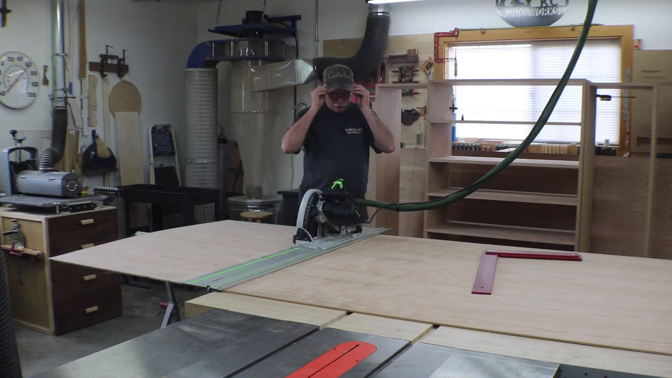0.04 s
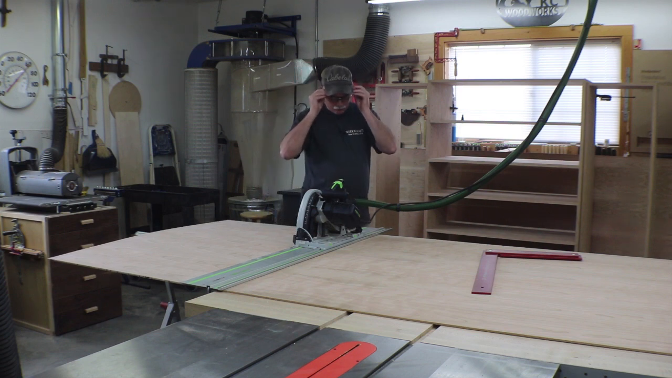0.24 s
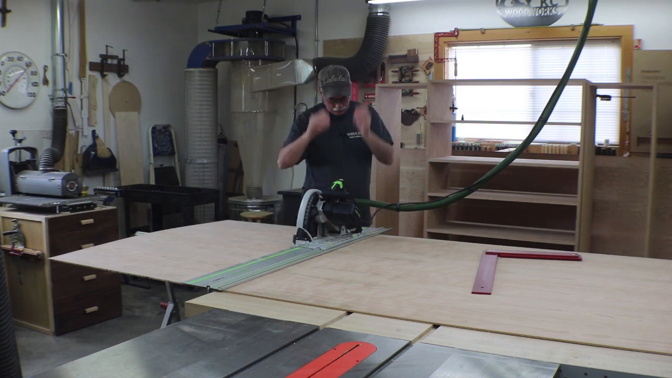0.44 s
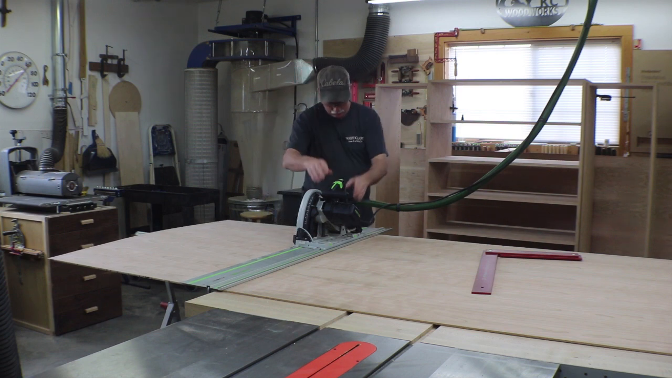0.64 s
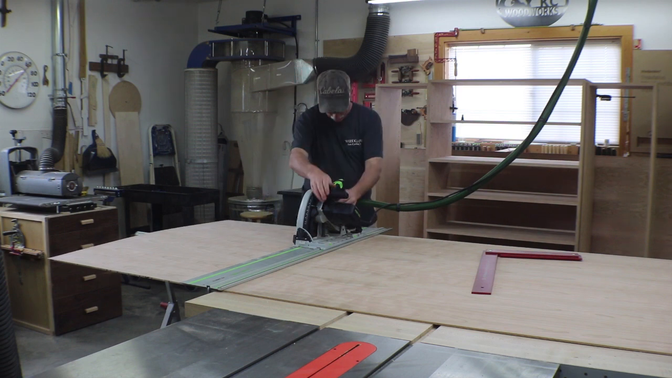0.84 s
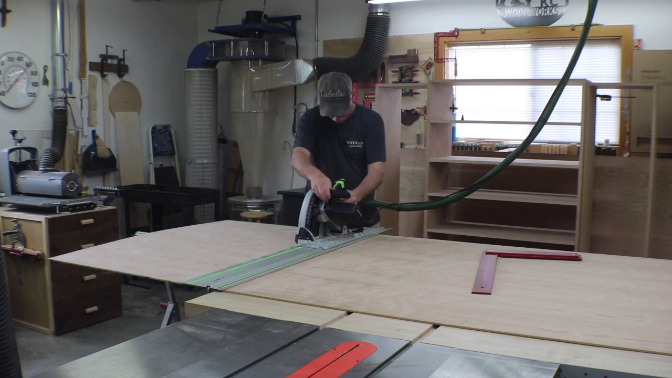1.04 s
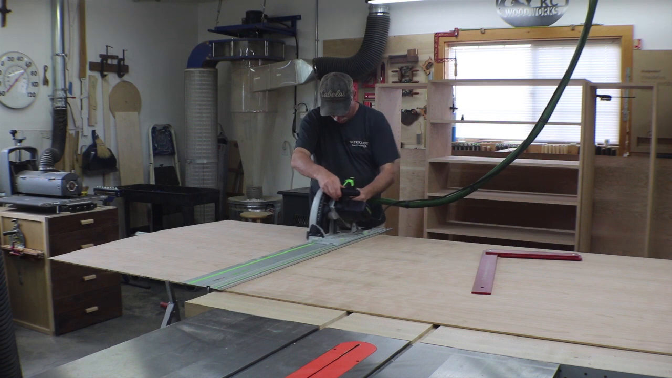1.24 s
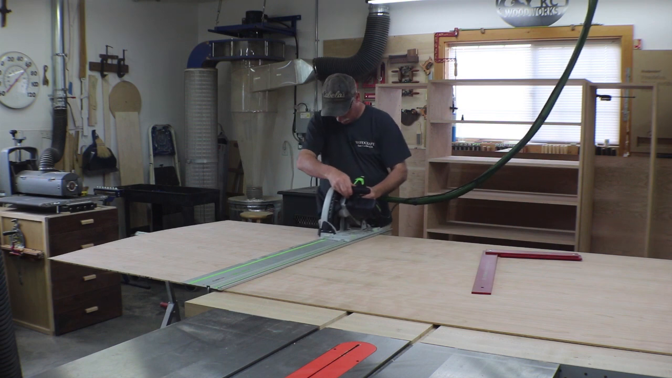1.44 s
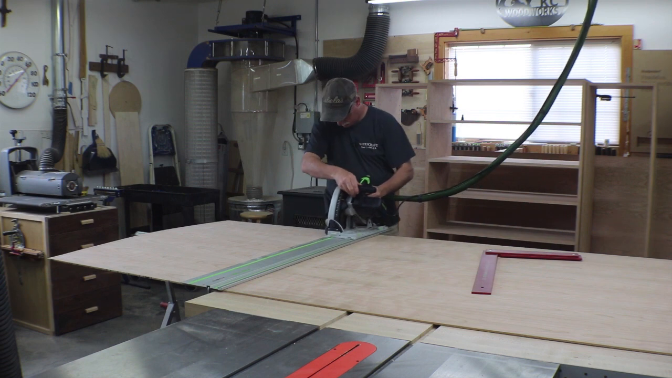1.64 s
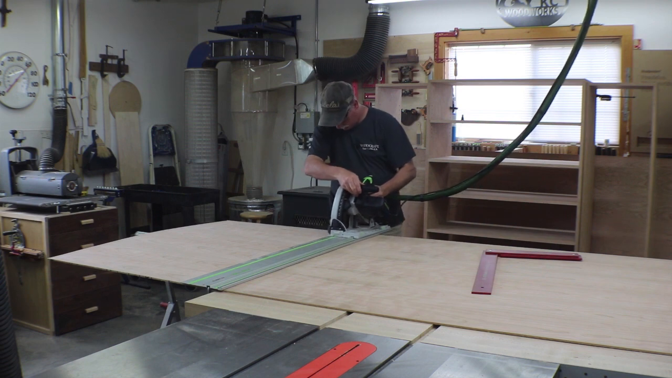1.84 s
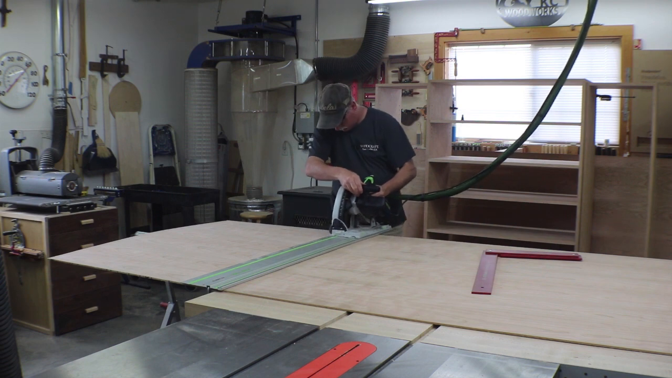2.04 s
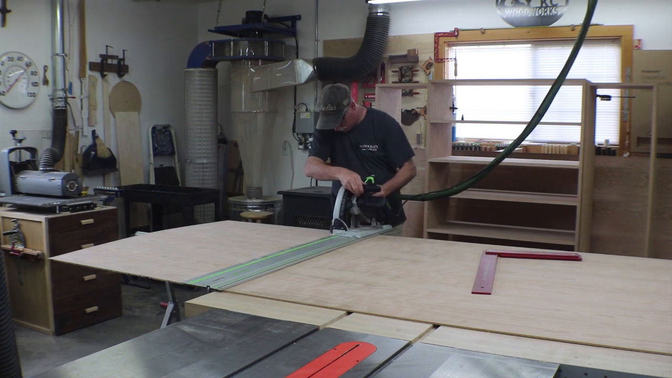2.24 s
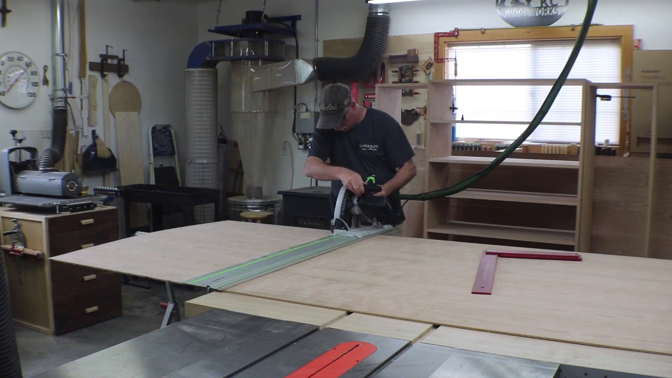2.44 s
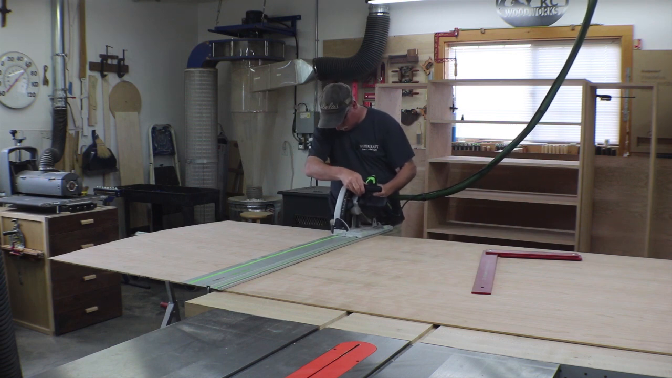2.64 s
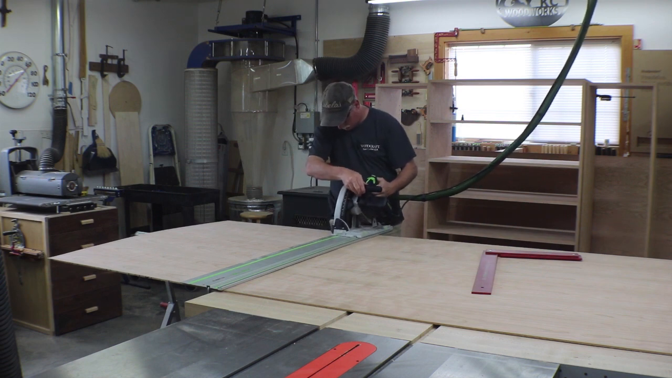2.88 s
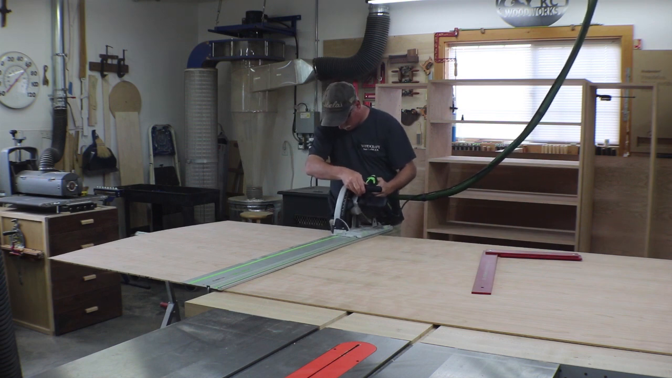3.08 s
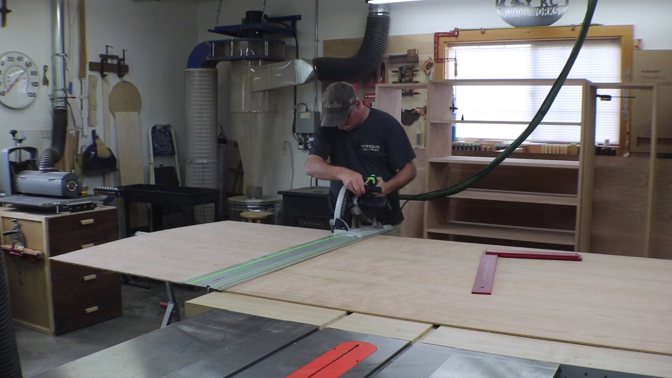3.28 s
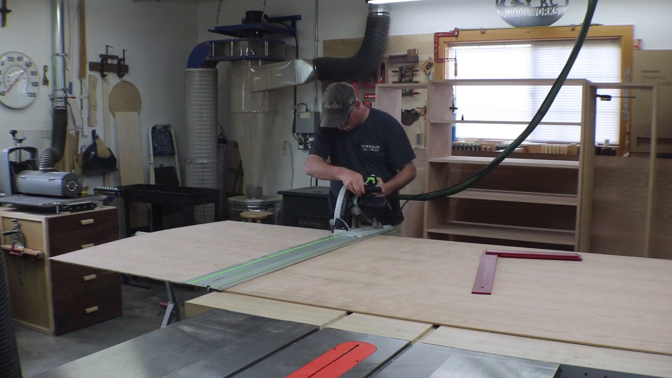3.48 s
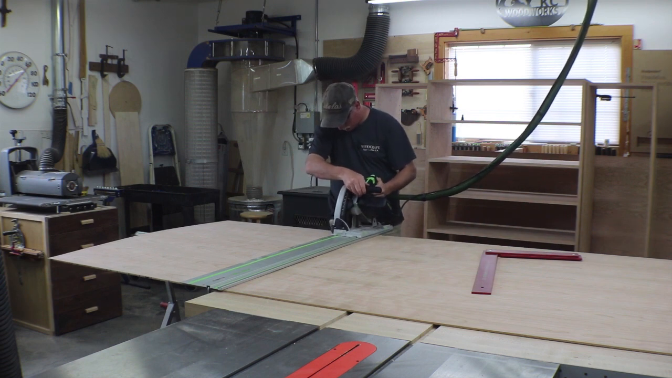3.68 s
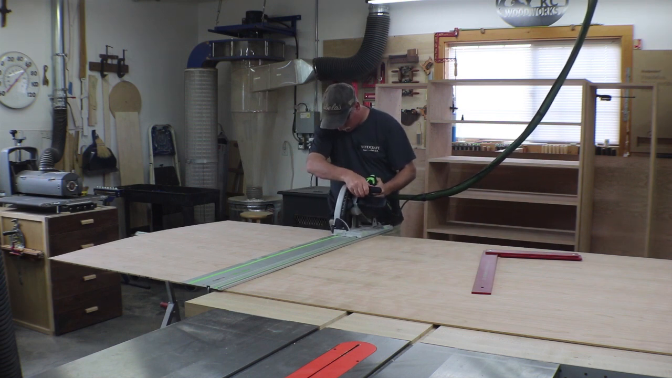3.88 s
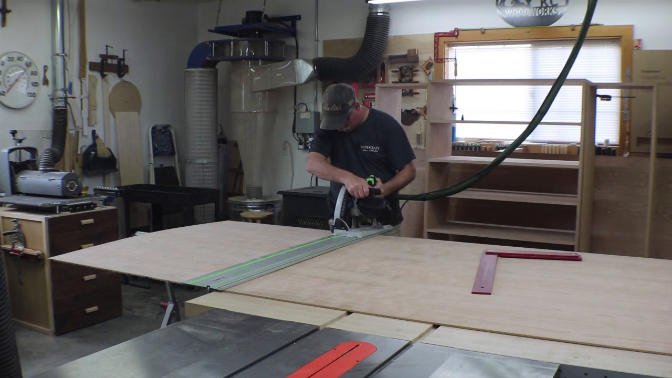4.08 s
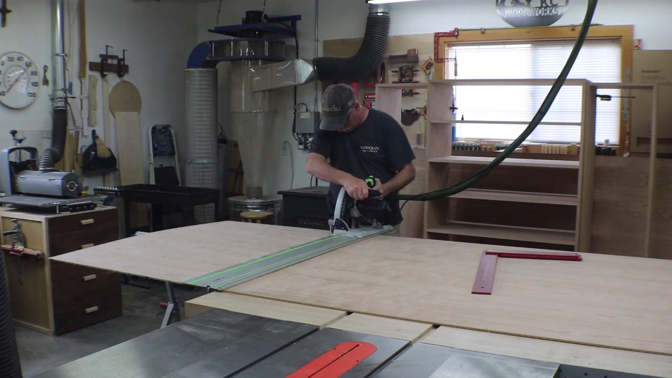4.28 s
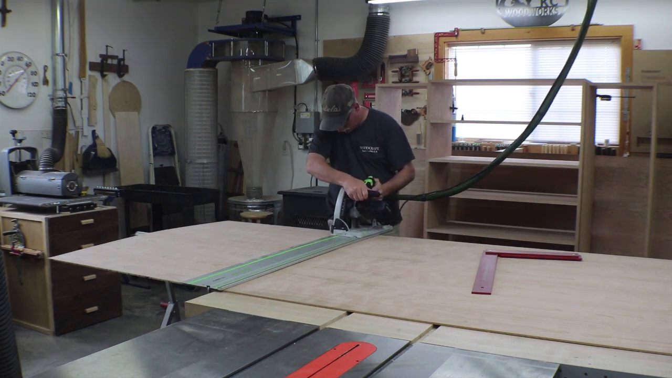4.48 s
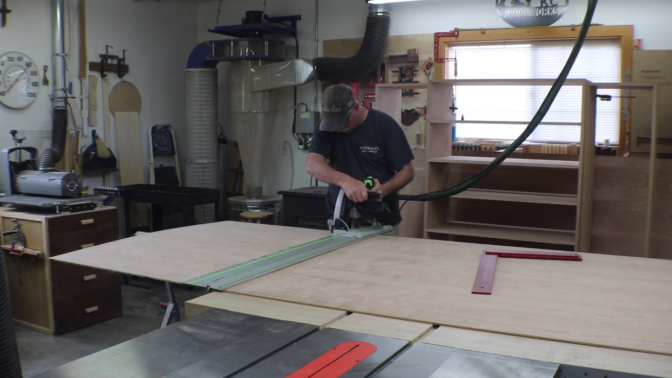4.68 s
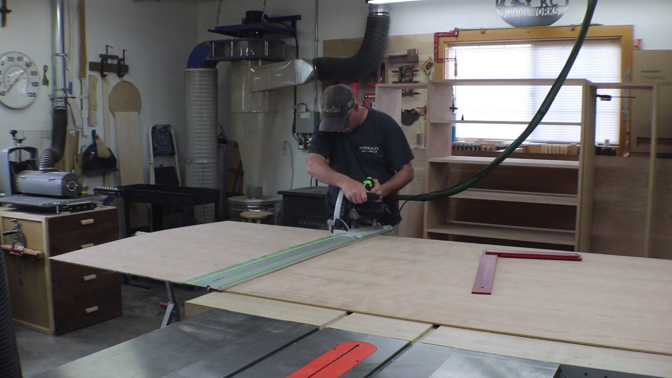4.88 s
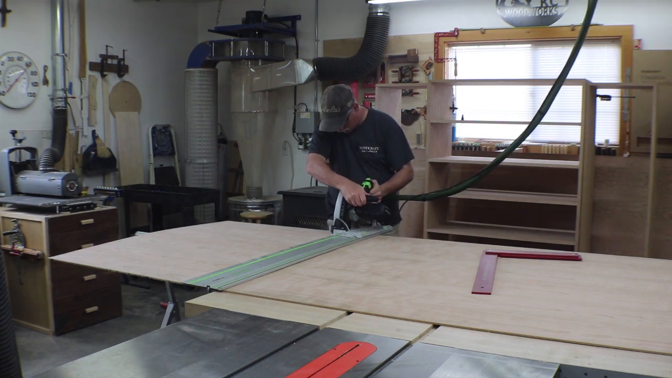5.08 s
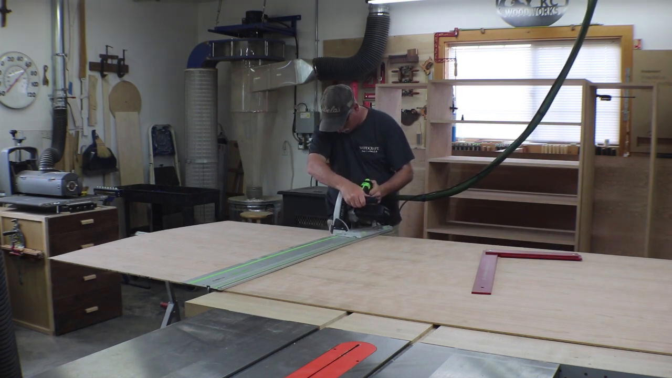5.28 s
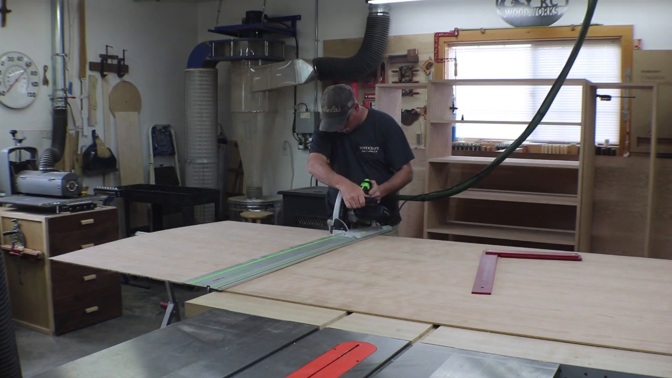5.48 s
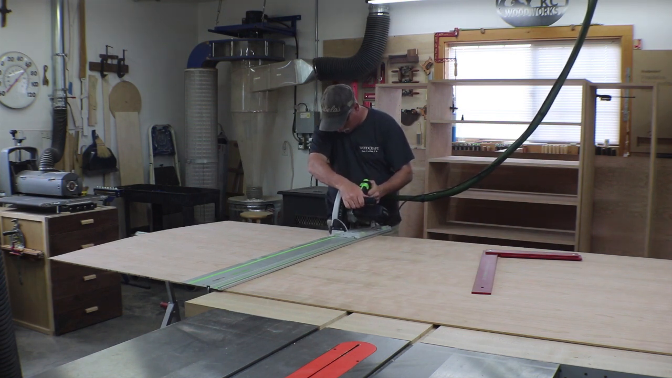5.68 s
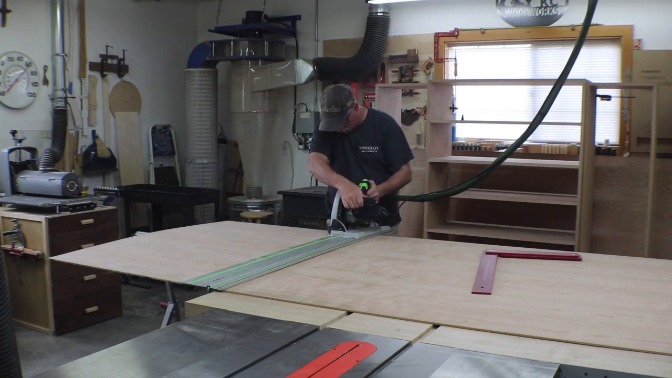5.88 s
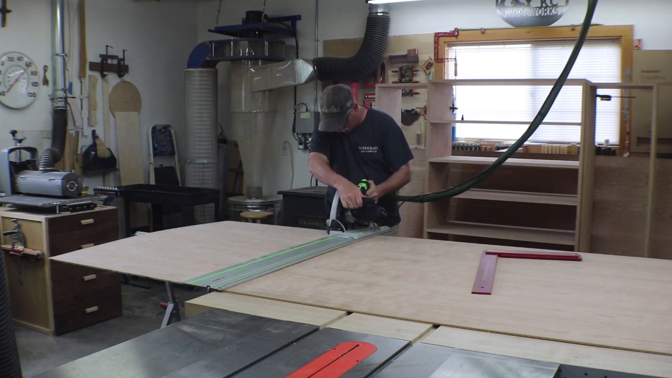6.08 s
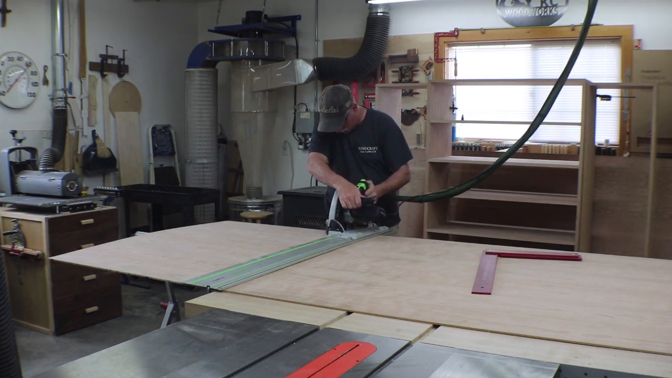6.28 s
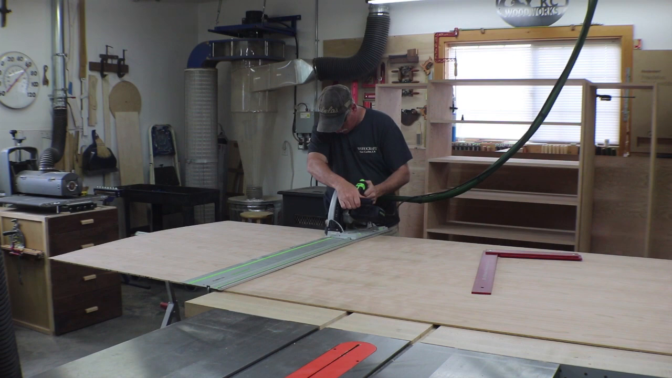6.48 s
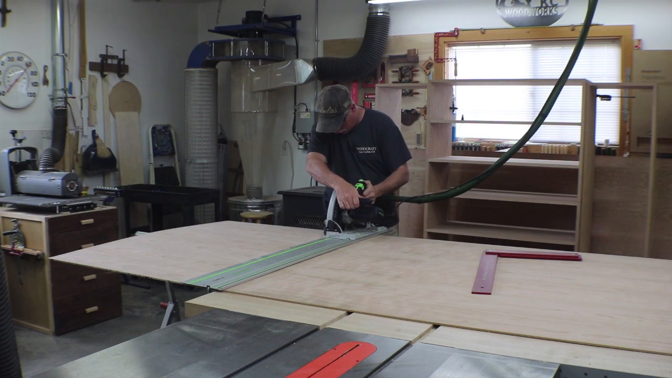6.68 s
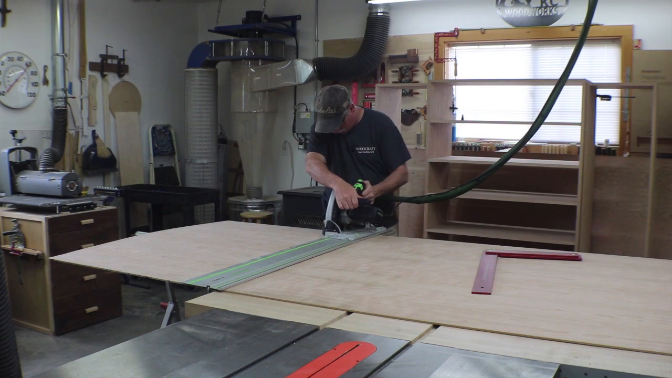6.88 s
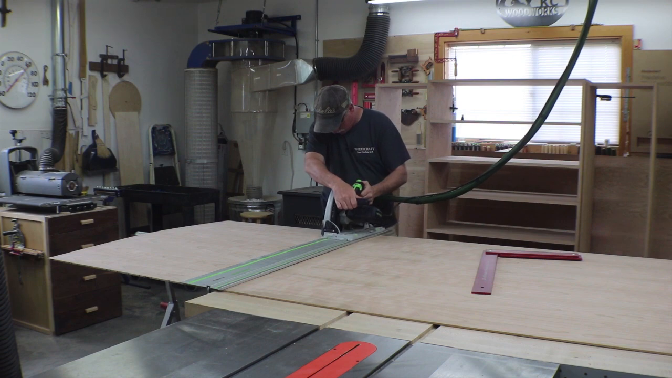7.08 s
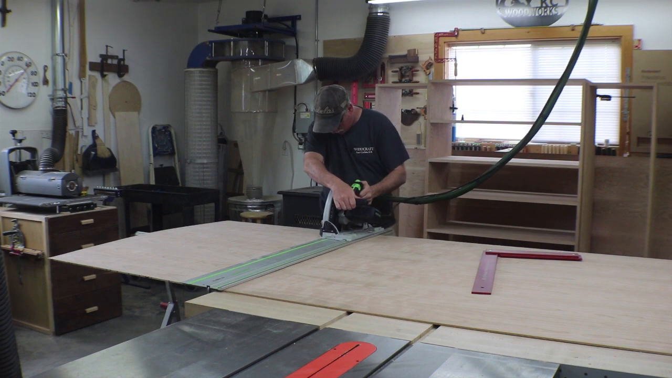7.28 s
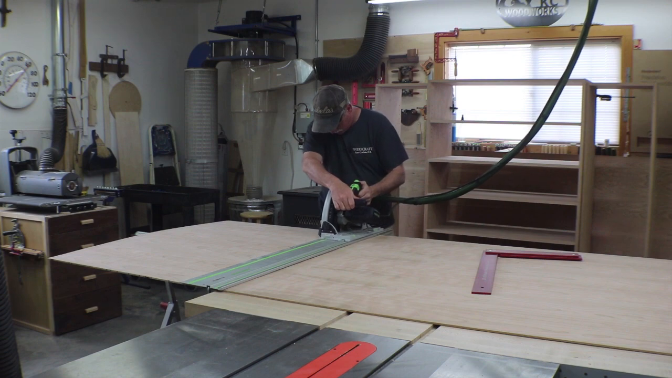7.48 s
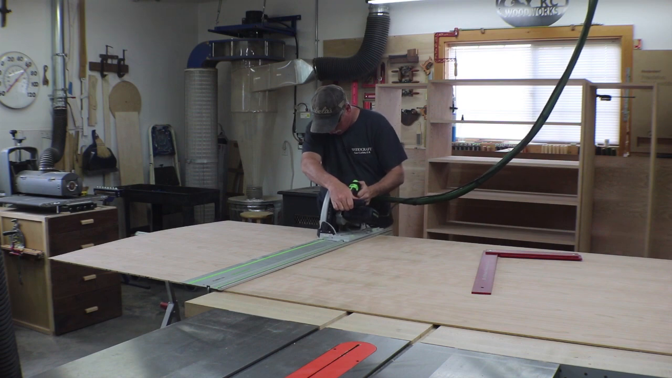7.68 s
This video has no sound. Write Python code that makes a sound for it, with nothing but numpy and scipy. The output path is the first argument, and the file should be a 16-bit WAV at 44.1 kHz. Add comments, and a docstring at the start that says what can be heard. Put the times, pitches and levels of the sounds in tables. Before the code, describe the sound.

A circular saw is knocked down and slid along its rail on plywood, its switch snaps, then the motor growls and whines up to a loud steady roar.

```python
"""A hand saw's motor soft-starts: it growls under the starting current, its windings buzz at twice the mains
rate, the shaft whine climbs, and shaped noise as air roar and a set of wavering steady tones take over. Before
that the saw is set on a plywood sheet (damped modes and noise), slid along its rail in grainy noise, and its
switch snaps as short rings. A small reverberant shop, nearly mono: only the hiss differs by channel."""
import sys
import numpy as np
from scipy import signal
from scipy.fft import rfft, irfft, next_fast_len
from scipy.io import wavfile
from scipy.ndimage import uniform_filter1d, map_coordinates

SR = 44100
rng = np.random.default_rng(int(sys.argv[2]) if len(sys.argv) > 2 else 0)


def convert_level_to_amplitude(level_db):
    """Map a level in decibels to its linear amplitude factor."""
    exponent = np.asarray(level_db, float) / 20
    return 10 ** exponent


def store_wav(level_fs):
    """Save 16-bit WAV to argv[1]."""
    pcm = np.round(np.clip(np.atleast_2d(level_fs), -1, 1) * 32767)
    wavfile.write(sys.argv[1], SR, pcm.T.astype(np.int16))


N = 340893
T = np.arange(N) / SR

# low shaking of sheet and bench, spectrum: hz, density_db
SHAKING = [(20, -40), (35, -10), (60, -9), (110, -4.5), (150, -6.5), (220, -12.5), (300, -57)]
# starting current as growl level, before surge and pulsing: time_s, level_db
CURRENT = [(3.4, -60), (3.474, -45.5), (3.49, -40), (3.56, -32), (3.68, -29.5), (3.705, -22), (3.727, -22),
           (3.729, -21), (4.4, -21.5), (4.8, -26.5), (5.4, -39), (5.9, -48), (7.73, -41)]
# whine wavering about full speed: time_s, pitch_hz, level_db
STEADY = [(4.87, 12748, -36), (5.07, 12677, -28), (5.17, 12721, -36), (5.18, 12720, -50), (5.2, 12714, -35),
          (5.28, 12736, -39), (5.35, 12703, -27), (5.39, 12736, -45), (5.46, 12747, -32),
          (5.54, 12803, -33), (5.77, 12778, -41), (5.89, 12742, -29), (5.9, 12758, -32), (6.02, 12740, -30),
          (6.23, 12773, -31), (6.34, 12753, -29), (6.36, 12763, -30), (7.38, 12759, -31), (7.5, 12754, -36),
          (7.63, 12780, -30), (7.69, 12742, -37), (7.72, 12751, -34)]

MAINS_HZ, FIRST_KICK_S, FULL_POWER_S = 60, 3.479, 3.728  # soft start
FULL_HZ, FULL_S = 425.2, 4.87  # shaft turns per second at full speed, and when it is reached
BARS = 30  # whine cycles per shaft turn
BUZZ_HZ = 120.52


def unit(x):
    """Scaled to rms 1."""
    return x / np.sqrt(np.mean(x ** 2) + 1e-20)


def along(points, hz):
    """Values between (Hz, value) points on a log axis."""
    f, v = np.transpose(points)
    return np.interp(np.log(hz + 1), np.log(f + 1), v)


def level_curve(rows):
    """Level per sample from (s, dB) rows; silent before the first, held after the last."""
    s, db = np.transpose(rows)
    return np.interp(T, s, db, left=-120)


def wobble(rate):
    """A smooth random curve, rate knots a second."""
    knots = rng.standard_normal(int(N * rate / SR) + 4)
    coarse = map_coordinates(knots, [T[::16] * rate])
    return np.interp(T, T[::16], coarse)


def filtered(x, response):
    """x times a response of frequency."""
    m = next_fast_len(N + 8192)
    return irfft(rfft(x, m) * response(np.fft.rfftfreq(m, 1 / SR)), m)[..., :N]


def bell(hz, centre, width):
    """A resonance-shaped weight, 1 at its centre."""
    return 1 / (1 + (2 * (hz - centre) / width) ** 2)


def rush(spectrum, patchy_db, peaks=()):
    """Coloured noise of rms 1 with time-frequency patches of random gain."""
    z = signal.stft(rng.standard_normal(N), nperseg=512)[2]
    patches = uniform_filter1d(rng.standard_normal(z.shape), size=6, axis=0)
    patches = uniform_filter1d(patches, size=10, axis=1)
    noise = signal.istft(z * convert_level_to_amplitude(patchy_db * unit(patches)), nperseg=512)[1][:N]
    boost = lambda hz: sum(db * bell(hz, c, w) for c, w, db in peaks)
    return unit(filtered(noise, lambda hz: convert_level_to_amplitude(along(spectrum, hz) + boost(hz))))


def ring(modes, scatter_db):
    """Damped modes of one blow, at new random strengths each time."""
    t = T[:SR // 4]
    out = 0
    for hz, db, t60 in modes:
        level = convert_level_to_amplitude(db + scatter_db * rng.standard_normal() - 60 * t / t60)
        onset = 1 - np.exp(-2 * t * hz)
        out = out + level * np.sin(2 * np.pi * hz * t) * onset
    return out


def shop(x):
    """The room's answer: a delayed noise tail in which each frequency dies at its own speed."""
    # decay of the shop: hz, t60_s
    decay = [(200, 1), (2000, 0.36), (7000, 0.047), (14000, 0.03)]
    hz, t, z = signal.stft(rng.standard_normal(SR // 2), SR, nperseg=256)
    tail = signal.istft(z * convert_level_to_amplitude(-60 * t / along(decay, hz)[:, None]), SR, nperseg=256)[1]
    return signal.fftconvolve(np.pad(x, (300, 0)), tail / np.linalg.norm(tail))[:N]


def swell(s, db, half):
    """A bell-shaped gain over time."""
    return convert_level_to_amplitude(db) * np.exp(-((T - s) / half) ** 2)


def push(start, length, rise, fall):
    """Gain of one push, top 1; rise and fall are powers of its shape."""
    u, top = np.clip((T - start) / length, 0, 1), rise / (rise + fall)
    return (u / top) ** rise * ((1 - u) / (1 - top)) ** fall


def surge():
    """Jumps to 1 at full power and decays exponentially."""
    decay_s = 0.0301
    return (T > FULL_POWER_S) * np.exp(-np.abs(T - FULL_POWER_S) / decay_s)


def turns_hz():
    """Shaft speed: closes on full speed along a power of time, then follows the steady whine's pitch."""
    lag_hz, lag_power = 424, 2.2  # turns per second missing one second before full speed
    climb = np.maximum(FULL_HZ - lag_hz * np.maximum(FULL_S - T, 0) ** lag_power, 0)
    s, hz, _ = np.transpose(STEADY)
    return np.where(T < FULL_S, climb, np.interp(T, s, hz) / BARS)


def speed_db(least=0.53):
    """Shaft speed against full speed, as a level."""
    return 20 * np.log10(np.clip(turns_hz() / FULL_HZ, least, 1))


def rippled(x):
    """Narrow random peaks and dips, fixed and slowly shifting, stand for reflections near the saw."""
    fixed_db, shifting_db = 1.8, 1.3
    z = signal.stft(x, nperseg=4096)[2]
    still = uniform_filter1d(rng.standard_normal((len(z), 1)), size=2, axis=0)
    moving = uniform_filter1d(rng.standard_normal(z.shape), size=14, axis=0)
    moving = uniform_filter1d(moving, size=12, axis=1)
    depth = np.minimum(np.arange(len(z))[:, None] / 80, 1)  # the bass is hardly combed
    gain_db = depth * (fixed_db * unit(still) + shifting_db * unit(moving))
    return unit(signal.istft(z * convert_level_to_amplitude(gain_db), nperseg=4096)[1][:N])


def room_tone():
    """Low steady noise of the shop."""
    # spectrum: hz, density_db
    tone_spectrum = [(15, -30), (25, 2), (312, 9), (642, 1), (920, -12), (1080, -3), (1320, -2), (3000, -6),
                     (3900, -42), (6600, -120)]
    return convert_level_to_amplitude(-66) * rush(tone_spectrum, patchy_db=1.5)


def preamp_hiss():
    """One channel's own hiss."""
    # spectrum: hz, density_db
    preamp_spectrum = [(25, 0), (500, -6), (2000, -5.5), (8000, -5.5), (16000, -6)]
    return convert_level_to_amplitude(-58.5) * rush(preamp_spectrum, patchy_db=0.5)


def clicks():
    """Small hard clicks of something handled: one short ring with a noise crack on its front."""
    # time_s, level_db, pitch_hz
    handling = [(.0098, -40.5, 2600), (.2632, -41, 2430), (.2952, -41, 2050)]
    t60_s, crack_gain = .011, 0.67
    out, t = np.zeros(N), T[:SR // 20]
    for s, db, hz in handling:
        crack = crack_gain * convert_level_to_amplitude(-180 * t / t60_s) * rng.standard_normal(len(t))
        body = ring([(hz, 0, t60_s)], scatter_db=1)[:len(t)]
        out[round(s * SR):][:len(t)] += convert_level_to_amplitude(db) * (body + crack)
    return out + convert_level_to_amplitude(-10) * shop(out)


def brushes():
    """Brief cloth-like brushes: soft swells of mid and treble noise."""
    # time_s, level_db, half_length_s, treble_db
    cloth = [(0.855, -57, .04, 6), (2.707, -51.5, 0.043, -9)]
    out = 0
    for s, db, half, treble_db in cloth:
        spectrum = [(1000, -27), (2600, -3), (4500, -20), (11000, treble_db - 4), (16000, treble_db - 7)]
        out = out + swell(s, db, half) * rush(spectrum, patchy_db=2.0)
    return out


def slide():
    """The base scrapes along the rail in rough noise grains, rasping when fast and shaking the sheet."""
    # pushes along the rail: start_s, length_s, scrape_db, hiss_db
    strokes = [(0, 0.073, -68, -63), (0.543, 0.73, -59.5, -61), (0.995, 1.17, -41.5, -44.5),
               (2.084, 0.52, -70, -83), (2.66, 0.82, -63.5, -71), (3.194, 0.36, -54.5, -56)]
    # low shudders of the sheet: time_s, level_db, half_length_s
    shudders = [(.6, -65, 0.044), (0.837, -52, 0.053), (1.026, -42, 0.064), (1.29, -46, 0.062),
                (1.555, -49, 0.016), (1.77, -47.5, 0.2), (2.435, -62, 0.034), (2.7, -67, .05)]
    # scrape spectrum: hz, density_db
    scrape_spectrum = [(120, -46), (200, -14), (258, 0.5), (294, -2.5), (476, 3.5), (598, -6.5),
                       (720, -0.5), (1170, -4.5), (1550, -5), (2060, -7.5), (4330, -20.5), (5510, -21),
                       (6000, -40.5), (7800, -43), (13200, -120)]
    # rail resonances: centre_hz, width_hz, boost_db
    rail = [(700, 150, 3), (1750, 350, 7), (5500, 250, 7)]
    # sliding hiss spectrum: hz, density_db
    hiss_spectrum = [(1470, -32), (2500, -0.5), (3110, -1), (5560, -11), (6150, -12), (14700, -17),
                     (16000, -8)]
    # the rail's ring under a fast push: hz, density_db
    rasp_spectrum = [(900, -42), (1300, -3), (1600, -1.5), (1850, -5.5), (2100, -27), (4000, -60)]

    before_kicks = T < FIRST_KICK_S
    force, speed, rasping = convert_level_to_amplitude(-71.5) * before_kicks, convert_level_to_amplitude(-77) * before_kicks, 0
    for start, length, scrape_db, hiss_db in strokes:
        force = force + convert_level_to_amplitude(scrape_db) * push(start, length, rise=0.37, fall=1.46)
        speed = speed + convert_level_to_amplitude(hiss_db) * push(start, length, rise=1.37, fall=3.1)  # hiss needs more speed
        rasping = rasping + convert_level_to_amplitude(scrape_db - 4) * push(start, length, rise=2.6, fall=2.6)
    shake = convert_level_to_amplitude(-74) + sum(swell(*row) for row in shudders)

    grains = convert_level_to_amplitude(wobble(30) + 1.2 * wobble(150))
    scrape = force * unit(grains * rush(scrape_spectrum, patchy_db=0.5, peaks=rail))
    rumble = shake * convert_level_to_amplitude(0.81 * wobble(5.9)) * rush(SHAKING, patchy_db=3.0)
    rasp = rasping * rush(rasp_spectrum, patchy_db=4.5)
    return scrape + rasp + rumble + speed * rush(hiss_spectrum, patchy_db=2.5)


def knocks():
    """Blows ring the sheet's low modes; harder contact adds a stronger dense thud that dies fast."""
    # blows on the sheet: time_s, level_db, hardness_db, favoured_mode_hz
    blows = [(.571, -46, 0, 345), (.9685, -14, 6, 345), (1.241, -28, 5, 480), (1.55, -37, -4, 90),
             (1.665, -35, -4, 480), (1.8035, -33, 9, 420), (2.4265, -35, -12, 385), (2.4415, -36, -16, 350)]
    # modes of the sheet: hz, level_db, t60_s
    sheet = [(75, -6, .12), (110, -7, .12), (172, -5, .1), (345, 0, .08), (385, -3, .07), (479, -4, .07),
             (711, -5, .08), (958, -7, .04)]
    # thud spectrum: hz, density_db
    thud_spectrum = [(150, -31), (400, -7), (700, 7), (1000, -1), (2200, -3), (2700, -17), (4300, -16),
                     (5000, -30), (16000, -31)]
    out, thud = np.zeros(N + SR), np.zeros(N + SR)
    for s, db, hard_db, spot_hz in blows:
        # modes weaken away from the one the spot favours, less for a harder contact
        loss_db = 11 - hard_db  # per octave
        modes = [(hz, level - loss_db * abs(np.log2(hz / spot_hz)), t60) for hz, level, t60 in sheet]
        blow = ring(modes, scatter_db=1.5)
        start = round(s * SR)
        out[start:][:len(blow)] += convert_level_to_amplitude(db) * blow
        thud[start:][:len(blow)] += convert_level_to_amplitude(db + hard_db - 11 - 60 * T[:len(blow)] / 0.055)
    out, thud = out[:N], thud[:N] * rush(thud_spectrum, patchy_db=0.5)
    return out + thud + shop(convert_level_to_amplitude(-24) * out + convert_level_to_amplitude(-11) * thud)


def ticks():
    """Plastic ticks and switch snaps ring casing and spring contact with a crack; the blade shimmers."""
    # time_s, level_db, brightness_db
    snaps = [(3.199, -30, -18), (3.2518, -20, 1.5), (3.269, -19, -9), (3.2728, -21.5, 10),
             (3.275, -18.5, 7.5), (3.577, -48, 7), (3.635, -48, 6), (3.707, -25, -6)]
    # casing modes: hz, level_db, t60_s
    casing = [(1500, -4, .015), (1900, -2, .015), (2400, -1, .015), (3000, -5, .012), (3500, -5, .012),
              (4330, -9, .012)]
    # spring contact modes: hz, level_db, t60_s
    contact = [(7000, -2, 0.0092), (10300, -18, .012), (11700, -6.5, 0.013), (12540, -12, 0.011)]
    # dense ring of the steel blade: hz, density_db
    blade = [(2500, -39), (5000, -4), (7000, 6), (8200, -4), (11000, -15), (16000, -14)]
    out, shimmer = np.zeros(N + SR), np.zeros(N + SR)
    for s, db, bright_db in snaps:
        body = ring(casing, scatter_db=2)
        t, start = T[:len(body)], round(s * SR)
        crack = 1.83 * convert_level_to_amplitude(-60 * t / 0.017) * rng.standard_normal(len(t))
        bright = convert_level_to_amplitude(bright_db) * (ring(contact, scatter_db=6) + crack)
        out[start:][:len(t)] += convert_level_to_amplitude(db - 8.5) * (body + bright)
        shimmer[start:][:len(t)] += convert_level_to_amplitude(db + bright_db - 37 - 60 * t / 0.5)
    return out[:N] + convert_level_to_amplitude(-19.5) * shop(out[:N]) + shimmer[:N] * rush(blade, patchy_db=2.0)


def tones():
    """Unsteady tones that settle in around full speed; the higher, the more their phase wanders."""
    # tones before the shared rise: hz, level_db
    lines = [(1071, -47), (1429, -48), (1550, -48), (1728, -50), (1787, -47), (2143, -42), (2439, -47),
             (2470, -49), (2697, -51), (2805, -46), (3090, -49), (3273, -49), (3472, -46), (3655, -44),
             (4237, -48), (4290, -48), (4340, -49), (4404, -51), (4570, -51), (5120, -49), (5243, -50),
             (5370, -52), (5599, -50), (5798, -50), (6252, -49), (6368, -46), (6810, -47), (7135, -49),
             (7488, -46), (8101, -48), (8335, -46), (8452, -45), (9711, -45), (10212, -53), (10718, -44),
             (10950, -48), (11902, -51), (12199, -49), (12478, -51), (13765, -46), (13900, -49),
             (13998, -48), (14470, -49), (15014, -50)]
    # shared rise: time_s, gain_db
    rise = [(4.7, -28), (5.2, -1), (5.7, -0.5), (7.1, 4.5), (7.73, 5)]
    out = 0
    for hz, db in lines:
        level = convert_level_to_amplitude(db + 2.5 * wobble(2) + 2 * wobble(7))
        out = out + level * np.sin(2 * np.pi * hz * T + hz / 4500 * wobble(40))
    return np.sqrt(2) * convert_level_to_amplitude(level_curve(rise)) * out


def bench_rumble():
    """Low noise of the bench, shaken during the kicks and then by the speeding shaft."""
    jolt = swell(3.62, -38, 0.082)
    running = (T > FIRST_KICK_S) * convert_level_to_amplitude(np.maximum(-42 + 12 * speed_db(), -61))
    return (jolt + running) * rush(SHAKING, patchy_db=1.0)


def shaft():
    """Commutator whine, low orders and a brief rough partial are multiples of the shaft speed."""
    # commutator whine while climbing: pitch_hz, level_db
    climbing_whine = [(7400, -57), (8300, -34), (9000, -20.5), (9800, -31.5), (10900, -28.5), (11400, -56),
                      (12050, -46), (12450, -29), (12800, -37)]
    # low orders before speed and bench gain: multiple_of_shaft_speed, level_db
    low_orders = [(1, -34.5), (2, -44.5), (4, -43), (10, -52), (15, -48)]
    turns, slow_db = turns_hz(), speed_db()
    jitter = 1 + 0.00042 * wobble(40) + 0.000403 * wobble(8)
    phase = 2 * np.pi * np.cumsum(turns * jitter) / SR

    s, _, steady_db = np.transpose(STEADY)
    whine_db = np.where(T < FULL_S, along(climbing_whine, BARS * turns), np.interp(T, s, steady_db))
    whine_db = whine_db + wobble(9) + 0.82 * wobble(25)
    # mains ripple puts tones a buzz pitch above and below the whine, strongest on reaching full speed
    sides_db = -14.5 - 6 * np.abs(T - FULL_S)
    ripple = 1 + 2 * convert_level_to_amplitude(sides_db) * np.sin(2 * np.pi * BUZZ_HZ * T)
    whine = convert_level_to_amplitude(whine_db) * ripple * np.sin(BARS * phase)

    orders = 0
    for k, db in low_orders:
        bench_db = 14 * bell(k * turns, 380, 24)  # a bench resonance that the shaft passes through
        orders = orders + convert_level_to_amplitude(db + 3.7 * slow_db + bench_db + 1.1 * wobble(5)) * np.sin(k * phase)
    glide = swell(4.23, -37, .09) * convert_level_to_amplitude(3 * wobble(60)) * np.sin(13.3 * phase + wobble(80))
    return np.sqrt(2) * (turns > 0) * (whine + orders + glide)


def buzz():
    """Winding overtones of twice the mains rate, rough at low current, then cleaner and fading."""
    # overtones: multiple_of_buzz_pitch, level_db, fade_db (lost by one second after 3.78 s)
    windings = [(1, -37, -0.5), (2, -29, 19), (3, -16, 31.5), (4, -21.5, 12), (5, -28.5, 3), (6, -59, 15),
                (7, -18, 14), (8, -58, 11), (9, -22.5, 11.5), (10, -53, -9.5), (11, -24.5, 9.5),
                (13, -53, 1), (14, -27, 37), (16, -44, -6), (17, -39, 6), (18, -33, 3)]
    ends_s = 5.44
    jump = surge()
    hz = BUZZ_HZ + 17.83 * jump ** 2  # the pitch jolts upward at full power
    db = np.where(T < FULL_POWER_S, level_curve(CURRENT) + 13, -11 * jump)
    db = db - 400 * np.maximum(T - ends_s, 0)
    # loss per octave away from 3.2 times the buzz pitch (its size counts, not its sign)
    damp_db = np.where(T < FULL_POWER_S, 9, 2 * (T - FULL_POWER_S) - 9 * jump)
    phase = 2 * np.pi * np.cumsum(hz) / SR
    since = np.maximum(T - 3.78, 0) ** 0.87
    stack = 0
    for k, level, fade in windings:
        far_db = np.abs(damp_db * np.log2(k / 3.2))  # the housing's resonance favours near overtones
        rough = np.clip(damp_db, 0, 20) * .3 * wobble(45) + wobble(5)
        overtone = np.sin(k * phase + rough / 3 + rng.uniform(0, 2 * np.pi))
        stack = stack + convert_level_to_amplitude(level - fade * since - far_db + rough) * overtone
    return np.sqrt(2) * convert_level_to_amplitude(db) * stack


def growl():
    """Noise following the current, kicked once a mains cycle, then pulsing at twice the mains rate."""
    # spectrum: hz, density_db
    growl_spectrum = [(60, -46), (170, -23), (260, -19.5), (400, -9.5), (600, -5), (1300, -1), (2100, -3),
                      (2600, -10.5), (3500, -8.5), (4300, -13), (4900, -20.5), (9000, -32.5), (16000, -36)]
    # casing bands and a gap: centre_hz, width_hz, boost_db
    kicked_bands = [(1450, 250, 2.5), (2050, 170, 2.5), (2800, 500, -1.5), (4030, 500, 2)]
    cycle = (T - FIRST_KICK_S) * MAINS_HZ
    kick = np.clip(cycle.astype(int), 0, MAINS_HZ - 1)
    size_db = 1.5 * rng.standard_normal(MAINS_HZ)[kick]
    kicks_db = size_db + 4 - 9 * (cycle % 1)
    pulse_db = np.where(T < FULL_POWER_S, kicks_db, 1.5 * np.sin(4 * np.pi * cycle))
    level_db = level_curve(CURRENT) + 10 * surge() + pulse_db + wobble(29.76)
    return convert_level_to_amplitude(level_db) * rush(growl_spectrum, patchy_db=2.0, peaks=kicked_bands)


def air_roar():
    """Air noise that grows with shaft speed, coloured by blade and guard and combed by reflections."""
    # spectrum: hz, density_db
    roar_spectrum = [(35, -49), (60, -17.5), (323, -7.5), (427, -5), (503, -6), (1010, -10), (1860, -4),
                     (2650, -14.5), (3190, -9.5), (3850, -15.5), (4860, -17.5), (8320, -9.5),
                     (11500, -16.5), (13300, -16), (16000, -19.5)]
    # blade and guard resonances: centre_hz, width_hz, boost_db
    housing = [(1750, 210, -3), (3200, 510, 1.5), (4220, 180, 3), (6860, 1200, 2.5), (8800, 400, 3),
               (9700, 150, 0.5), (10200, 360, -4.5), (13400, 350, 4), (14600, 300, 4), (15200, 300, 4),
               (14100, 370, 4.5)]
    # bands that swell as the saw travels: centre_hz, width_hz, level_db, top_s, half_length_s
    moving_bands = [(3200, 200, -5.5, 5.83, 0.53), (3550, 180, -10, 6.8, 0.68)]
    creep_db = -57 - 82 * (FULL_POWER_S - T)  # climb until full power, in dB per second
    running_db = np.maximum(-18 + 1.5 * speed_db(least=.01), -31.5)
    roar_db = np.where(T < FULL_POWER_S, creep_db, running_db) + 0.4 * wobble(7) + 0.2 * wobble(18)
    roar = convert_level_to_amplitude(roar_db) * rippled(rush(roar_spectrum, patchy_db=0.4, peaks=housing))
    # the top and bottom of the roar fill in only near full speed
    edges = filtered(roar, lambda hz: 1 / (1 + (hz / 450) ** 4) + 1 / (1 + (11000 / (hz + 1)) ** 8))
    roar = roar - (1 - convert_level_to_amplitude(1.8 * speed_db())) * edges
    travel = 0
    for hz, width, db, s, half in moving_bands:
        travel = travel + swell(s, db, half) * filtered(roar, lambda f: bell(f, hz, width))
    return roar + travel


def scene():
    """All sources reach both channels alike."""
    handling = clicks() + brushes() + slide() + knocks() + ticks()
    motor = tones() + bench_rumble() + shaft() + buzz() + growl() + air_roar()
    mix = room_tone() + handling + motor
    return np.array([mix, mix])


def band_limit(x):
    """A steep low-pass at the top of the band."""
    return signal.sosfilt(signal.butter(12, 16420, fs=SR, output="sos"), x)


def record(dry):
    """Each channel adds its own hiss; then bass cut, soft clipping and a band limit."""
    bass_cut_hz, clip_level, top_hz = 40, .66, 15740
    hiss = np.array([preamp_hiss() for _ in dry])
    bass_cut = lambda hz: (1j * hz / bass_cut_hz) / (1 + 1j * hz / bass_cut_hz)
    taken = filtered(dry + hiss, bass_cut)
    taken = taken / (1 + np.abs(taken / clip_level) ** 5) ** (1 / 5)  # the loudest peaks round off
    return band_limit(filtered(taken, lambda hz: hz < top_hz))


dry = scene()
out = record(dry)
store_wav(out)
```